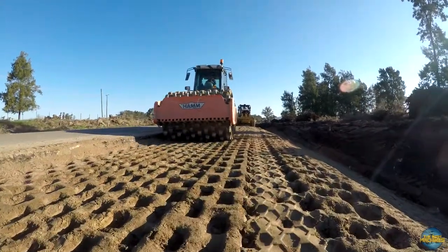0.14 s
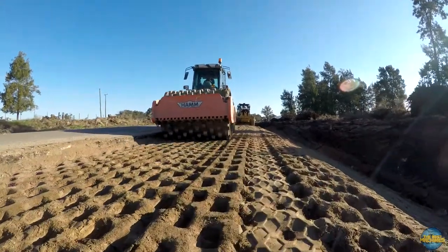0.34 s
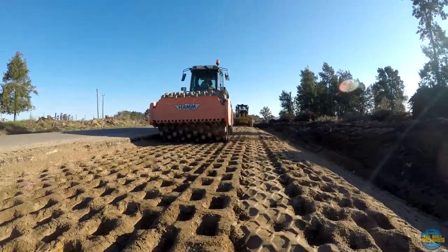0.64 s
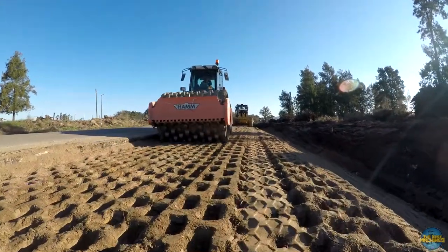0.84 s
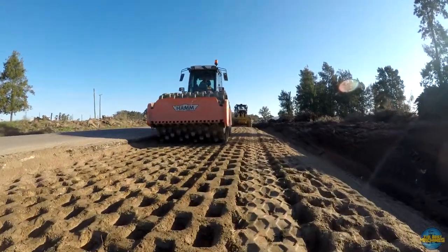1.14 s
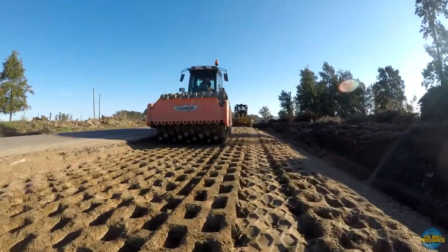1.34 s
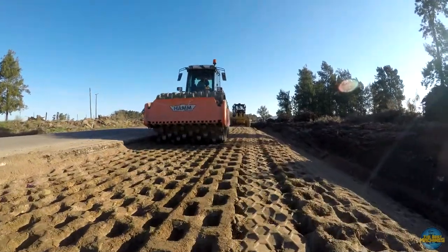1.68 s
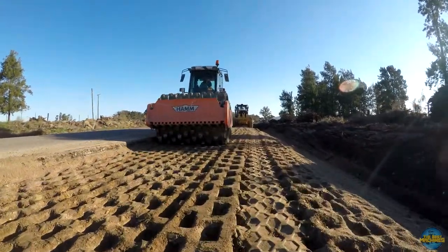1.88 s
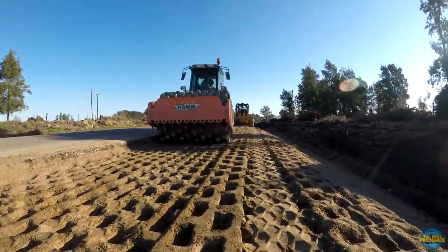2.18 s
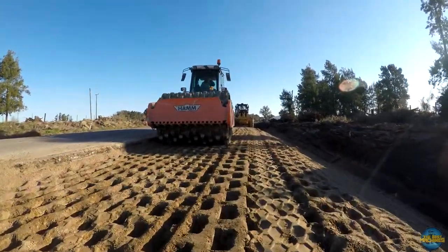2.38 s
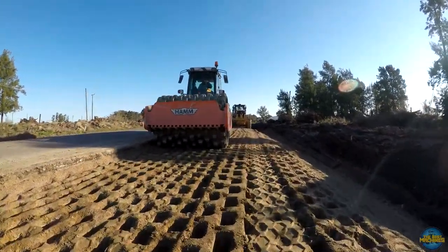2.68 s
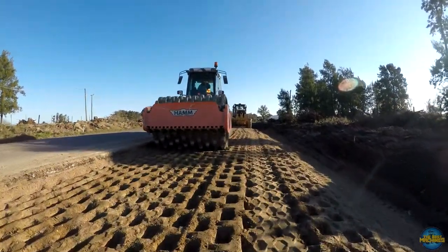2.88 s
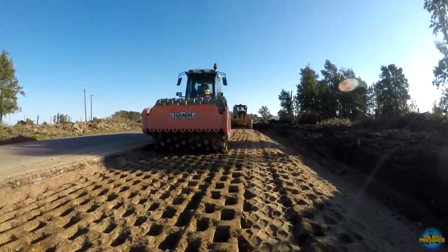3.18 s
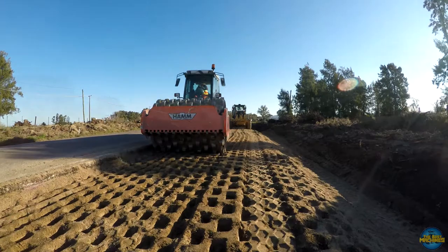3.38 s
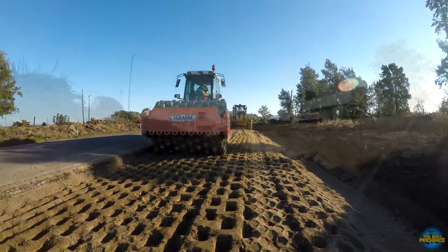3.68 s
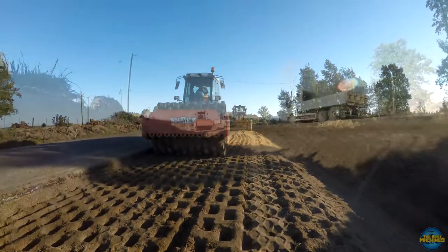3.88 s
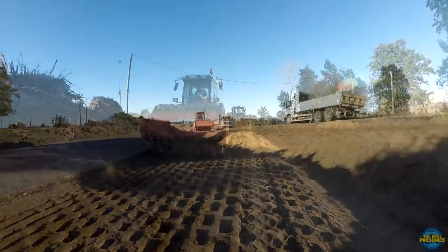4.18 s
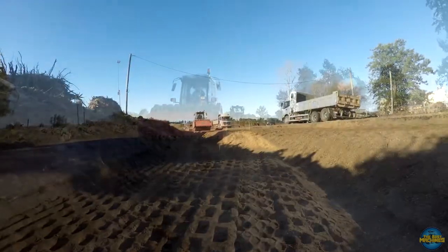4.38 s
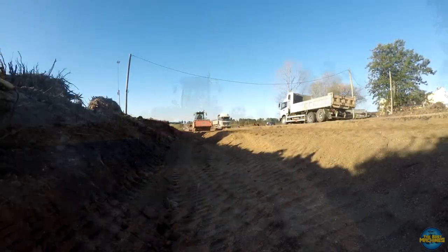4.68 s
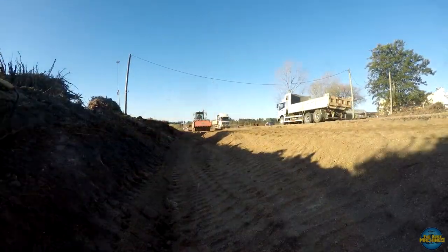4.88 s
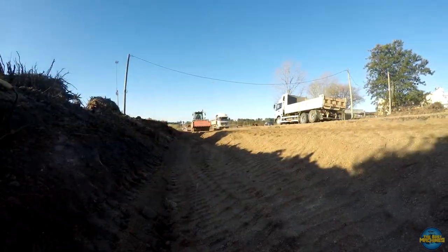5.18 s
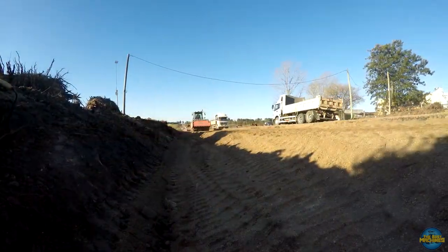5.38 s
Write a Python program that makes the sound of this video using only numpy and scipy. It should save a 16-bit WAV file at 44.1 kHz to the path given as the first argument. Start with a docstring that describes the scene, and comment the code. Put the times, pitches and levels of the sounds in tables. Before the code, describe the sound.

A diesel road roller works steadily outdoors, heard close in wide stereo. Its vibrating drum makes a very deep thudding drone at about 29 beats per second, joined by a low exhaust hum near 120 Hz and broad, gritty roar. Gear and pump tones waver above, with a hum near 370 Hz swelling around 3 s and a thin, smeared whistle near 5.3 kHz. Soft ticks and small metallic panel clanks appear throughout; a loose part taps rapidly at about 1.8-2.4 s and 3.4-4.3 s. Air hiss grows from 2.2 s, brightens to 3 s and fades by 3.4 s. From about 3.8 to 5 s the close roar crossfades to a darker, boomier, almost mono distant roar, and the whistle sinks. Around 4.4-4.6 s a dry clatter of cracks, crackle, hollow knocks and thumps strikes the microphone, with ringing clanks trailing. The low drone continues to the end, about 5.5 s.

```python
"""A roller's heavy thudding and diesel drone run on, while the roar around them dissolves from near to far.
The drum thud and the six-cylinder firing tone are sums of cosines; the roar is coloured noise in octave bands.
Gear, pump and drive tones waver, and a turbo whistles: a smeared tone. Noise and single clanks ring a panel,
a loose part taps with the drum, and hissing air and ticks are filtered noise. Near the end a clatter right at
the microphone adds cracks, crackle, knocks and thumps."""
import sys
import numpy as np
from scipy import signal
from scipy.fft import rfft, irfft, next_fast_len
from scipy.io import wavfile
from scipy.ndimage import uniform_filter1d

SR = 44100
rng = np.random.default_rng(int(sys.argv[2]) if len(sys.argv) > 2 else 0)


def output_pcm(signal):
    """Save a mono or channel-first signal as 16-bit PCM at the path in sys.argv[1].

    Samples are clipped to [-1, 1] before scaling.
    """
    pcm = np.clip(np.atleast_2d(signal).T, -1, 1) * 32767
    wavfile.write(sys.argv[1], SR, np.round(pcm).astype(np.int16))


N = 244314
T = np.arange(N) / SR  # time of each sample in seconds
SIZE = next_fast_len(N)  # length of the spectra

# Table levels are set before the waver, the near-far dissolve and the recorder.
# Speed of the drum's shaker. Each row: time in seconds, turns per second.
DRUM_SPEED = [(4.2, 29.0775), (4.45, 29.25)]
# Speed of the engine. Each row: time in seconds, four-stroke cycles per second.
ENGINE_SPEED = [(.8, 20.0775), (1, 20.04), (3.5, 20.025), (3.9, 20.04), (4.1, 20.1)]
DRUM_START, CYCLE_START = .2, -.075  # turns, cycles
# The soil pushes back unevenly. Each row: multiple of the shaker rate, sign, level against the thud
# in dB near, the same in dB far.
DRUM_OVERTONES = [(2, -1, -16, -24), (3, -1, -22.5, -15), (4, 1, -23, -29), (7, 1, -34, -34)]
# Uneven cylinders. Each row: multiple of the cycle rate, level against the firing tone in dB near, in dB far.
CYLINDER_TONES = [(3, -40, -6), (7, -18, -19), (8, -21, -30), (9, -22, -27), (18, -26, -24)]
# Drum thud, cut when the microphone is jolted. Each row: time in seconds, level in dB.
THUD_LEVEL = [(3.7, -10), (4.38, -13.5), (4.45, -16)]
# Exhaust firing tone, weakest half-way through the dissolve. Each row: time in seconds, level in dB.
FIRING_LEVEL = [(1.2, -22), (2.2, -20.5), (3, -22.5), (3.8, -21.5), (4.35, -25.5), (5.2, -20)]
DISSOLVE_START_S, DISSOLVE_END_S = 3.78, 4.96

# Gear and pump tones. Each row: multiple of the cycle rate, level in dB, left minus right in dB,
# wavering in dB, left lead in radians.
PUMP_TONES = [(28.5, -56, -4, 2.5, 1.5), (54, -56, -1, 2.5, 2.2), (72, -63, -3, 2.5, 1.6),
              (90, -63, -2, 2.5, 1.6)]
# The same columns, but the first is a multiple of the shaker rate.
SHAKER_TONES = [(21, -55.5, -10, 1.5, 1), (42, -61, -3, 2, 1.9), (56, -63, -2, 2, 1.5),
                (63, -63, -2, 2, 1.5)]
# Pump note that swells under load, then sags. Each row: start in seconds, end in seconds, starting level in dB.
PUMP_SWELLS = [(2.1, 3.05, -45), (3.25, 3.957, -46)]
PUMP_IDLE_DB, PUMP_ATTACK_S, PUMP_RELEASE_S, PUMP_SAG_DB_PER_S = -56, 0.037, 0.084, 4

# Drive hum that the drum chops into a comb of tones
HUM_HZ, HUM_PAN_DB, HUM_WANDER_TURNS = 373.0, -4, .1
# Place of each comb tone: shaker turns above or below the hum.
COMB_STEPS = [-6, -5, -4, -3, -2, 1, 2, 3, 4]
# Comb tones in the same order. Each row: level in dB at the middle of the echo band, left minus right in dB.
COMB_LEVELS = [(-45.5, -3), (-42, -1), (-43, -8.5), (-41, 0), (-43.5, 0.5), (-52, -3), (-48.5, -4),
               (-51, -9), (-49, -11.5)]
# The hum itself swells and sinks. Each row: time in seconds, level in dB.
HUM_LEVEL = [(0, -45), (1, -53), (1.6, -45.5), (2.2, -48.5), (2.9, -38.5), (3.3, -39.5), (4, -43.5)]
# The ground echo favours a band that climbs as the machine nears
ECHO_START_HZ, ECHO_OCTAVES_PER_S, ECHO_WIDTH_OCTAVES = 199.4, 0.32, 0.52

# Turbo whistle. Each row: time in seconds, pitch in Hz before the wobble, level in dB before a 4.5 dB lift.
TURBO_WHISTLE = [(0, 5310, -53), (.25, 5298, -52), (.5, 5314, -51), (1.05, 5303, -52.5), (1.8, 5321, -54),
                 (2.2, 5311, -55), (2.5, 5336, -52.5), (3.05, 5314, -51.5), (3.25, 5322, -55),
                 (3.55, 5342, -52), (4.2, 5318, -54), (4.65, 5322, -61), (5.05, 5305, -69),
                 (5.5, 5300, -72)]
TURBO_STEADY, TURBO_WOBBLE_HZ = 1.3, 14  # steady part against the noisy part; pitch wobble

# Roar of soil, exhaust, fan and casing, low and high part. Each row: frequency in Hz, level in dB per Hz.
NEAR_LOW = [(12, -64.5), (30, -55), (45, -55.5), (68, -45), (100, -51), (160, -51.5), (220, -56.5),
            (340, -65), (450, -60), (620, -71.5)]
NEAR_HIGH = [(1000, -74), (1400, -76.5), (1800, -74), (2250, -80.5), (2650, -86.5), (3400, -86),
             (4100, -89.5), (4800, -90), (6500, -87), (8000, -88), (10000, -94.5), (12000, -106),
             (15000, -116)]
FAR_LOW = [(12, -48), (30, -54), (45, -40.5), (65, -39.5), (100, -51.5), (135, -48), (165, -55),
           (220, -56.5), (300, -67), (420, -64.5), (700, -81)]
FAR_HIGH = [(1000, -85), (1400, -82.5), (1750, -83), (2100, -83.5), (2600, -90.5), (3300, -89.5),
            (4100, -88), (4800, -93.5), (6500, -94), (7700, -96.5), (8700, -96.5), (11000, -100),
            (13000, -106), (15000, -115)]
# Level moved from the lower to the upper octave of the near roar's growl
GROWL_START_DB, GROWL_DB_PER_S = -0.5, 0.36

# The two microphone ports, for the near roar, far roar, panel and hiss. Each row: frequency in Hz,
# likeness from 0 to 1 (taken as 1 for a single small source), left lead in radians, left minus right in dB.
NEAR_PORTS = [(158, 0.96, 0.16, -2.5), (260, 0.82, -0.5, -4.5), (563, 0.85, 1.5, -5), (717, 0, -2.5, -16.5),
              (800, 0.94, 5.5, -6.5), (1130, 0.52, 3, -1.5), (1750, 0.76, 1.5, -1), (2510, 0.4, 2, 1.5),
              (4170, 0.76, -0.34, -5), (4500, 0.8, -0.5, -1), (4980, 1, 7, -7.5), (7400, 0, 1.5, -7.5),
              (10100, 0, 21, -2)]
FAR_PORTS = [(250, 1, 0.00025, 0), (15000, 1, 0.014, 0)]
PANEL_PORTS = [(830, 1, 2.25, -3)]
HISS_PORTS = [(2800, .7, 0, -2), (3500, .6, 0, -3), (6000, .4, 0, -10), (9000, .1, 0, -2),
              (12000, .1, 0, 2)]

# Two resonances of the panel. Each row: frequency in Hz, width in Hz, strength in dB.
PANEL_MODES = [(821, 89, 15), (855, 33, -8.5)]
# Clanks on the panel. Each row: time in seconds, level in dB before a 5 dB lift, length in seconds,
# upper resonance against the lower in dB.
CLANKS = [(1.553, -42, .027, -12), (2.26, -34, .0073, -12), (2.351, -31.5, .012, -12),
          (2.371, -32, .01, -12), (2.611, -33, .006, -8), (2.811, -32, .005, -12), (3.035, -38, .036, -4),
          (3.158, -40, .012, -4), (3.616, -36, .01, -12), (4.055, -36, .0082, -12), (4.424, -38, .032, 0),
          (4.467, -37, .02, 0), (4.5, -37, .016, 0), (4.52, -24.5, .0076, -10), (4.569, -27, .012, 0),
          (4.585, -33, .034, -4), (4.635, -33, .036, -14), (4.683, -35.5, .016, -10),
          (4.711, -37.5, .024, -10), (4.825, -42, .02, -8)]
PANEL_NEAR_DB, PANEL_FAR_DB = -39.5, -44

# Two narrow bands of hiss from the machine come and go. Each row: time in seconds, lower dB, upper dB.
WHISPER_LEVELS = [(0.0, -64, -63), (0.43, -61, -60), (0.72, -66, -71), (0.98, -64, -72), (1.61, -68, -65),
                  (1.74, -57, -58), (2.07, -62, -67), (2.37, -62, -67), (2.7, -58, -53), (2.93, -54, -61),
                  (3.15, -60, -60), (3.38, -64, -65), (3.74, -67, -62), (4.14, -68, -68),
                  (5.25, -56.5, -57), (5.5, -61, -58)]
# The two bands. Each row: frequency in Hz, width in Hz.
WHISPER_BANDS = [(3760, 360), (4430, 230)]

# Resonances of the air hiss. Each row: frequency in Hz, width in Hz, strength in dB.
HISS_BANDS = [(2850, 480, 11), (3450, 520, 15.5), (5850, 1200, 7.5), (8000, 3500, -10)]
HISS_START_S, HISS_TOP_S, HISS_END_S, HISS_DB, HISS_TILT_DB = 2.16, 3.01, 3.36, -45, 3.5
# Short ticks with a dull body and a puff of treble. Each row: middle in seconds, body level in dB,
# puff level in dB, half of the full length in seconds.
TICKS = [(0.231, -52, -46, 0.037), (0.792, -48, -65, 0.012), (1.332, -46, -53, 0.023),
         (1.587, -60, -47.5, 0.013), (2.032, -44.5, -48, 0.023), (2.516, -42, -63, 0.011),
         (2.657, -40, -65, 0.016), (3.404, -34.5, -44.5, 0.015)]
BODY_HZ, PUFF_HZ, PUFF_PAN_DB = 1400, 6800, -11.5

# A loose part taps once a drum turn in spells. Each row: start in seconds, end in seconds, level in dB,
# place in the turn, chatter after the tap from 0 to 1.
RATTLE_SPELLS = [(1.75, 2.42, -47.5, .2, .15), (3.35, 4.3, -46.5, -.03, .03)]
# Resonances of the loose part. Each row: frequency in Hz, width in Hz, strength in dB.
RATTLE_MODES = [(1550, 300, -5), (1850, 280, -2), (2150, 300, 0), (2900, 500, -17)]
RATTLE_IDLE_DB, RATTLE_RAMP_S = -75, 0.23
REBOUND_TURNS, REBOUND_DB, CHATTER_TURNS = .17, -4, .22

# Clatter at the microphone. Each row: time in seconds, crackle in dB, length in seconds, first crack in dB,
# thump in dB, knock in dB, treble trim in dB, left minus right in dB.
JOLTS = [(4.407, -36, 0.0088, -35, -43, -28, -5, -3), (4.418, -34.5, 0.019, -14, -11, -30, -4, 2.5),
         (4.466, -40, 0.0091, -42, -43, -34, -2, 4), (4.473, -34.5, 0.011, -22, -44, -47, -3, 1),
         (4.584, -34.5, 0.0097, -23, -46, -47, -7, 4), (4.497, -37.5, 0.018, -38, -46, -37, -6, -2),
         (4.525, -33.5, 0.015, -25, -11, -28, -3, 1), (4.568, -34, 0.021, -26, -20, -22.5, 0, -2)]
# Resonances of the crackle, four body bands then two treble. Each row: frequency in Hz, width in Hz, dB.
CRACKLE_BANDS = [(502, 240, 1), (1140, 740, -3), (1790, 380, 6.5), (2180, 280, -8), (4550, 6600, -9.5),
                 (7200, 2300, -19)]
CLATTER_TAIL_DB, CLATTER_TAIL_S = -13, 0.023
KNOCK_HZ, KNOCK_S = 412, 0.011
THUMP_HZ, THUMP_S, THUMP_LATE_S = 100, .004, .003

TOP_HZ = 15050  # upper limit of the recorder


def undb(db):
    """Turns decibels into gain."""
    return 10 ** (np.asarray(db) / 20)


def curves(table):
    """Draws each column of a time table, one value a sample; ends are held."""
    s, *columns = np.transpose(table)
    return [np.interp(T, s, c) for c in columns]


def unit(x):
    """Scales a sound to an rms of 1."""
    return x / np.sqrt(np.mean(x ** 2))


def walk(rate):
    """Drifts between random levels, rate of them a second, smoothed twice; the spread is near 1."""
    held = np.repeat(rng.standard_normal(int(N / SR * rate) + 3), 8)
    soft = uniform_filter1d(uniform_filter1d(held, size=8), size=8)
    return 1.31 * np.interp(T * rate * 8, np.arange(len(soft)), soft)


def spell(start, end, attack, release):
    """Rises from 0 at the start to 1, holds until the end, then falls."""
    return np.clip(np.minimum((T - start) / attack, 1 - (T - end) / release), 0, 1)


def ring(x, modes):
    """Sends a sound through side-by-side resonances (Hz, width Hz, dB)."""
    return sum(undb(db) * signal.lfilter(*signal.iirpeak(hz, hz / width, SR), x) for hz, width, db in modes)


def pan(x, db):
    """Makes left and right at a level difference."""
    return x * undb(np.array([[db], [-db]]) / 2)


def ports(left, other, table):
    """Spectra at both ports: the right one hears a part of the left, shifted, and a part of its own."""
    hz, *columns = np.transpose(table)
    logf = np.log(np.maximum(np.fft.rfftfreq(SIZE, 1 / SR), 1))
    like, lead, db = (np.interp(logf, np.log(hz), c) for c in columns)
    if other is None:  # one small source: both ports hear only it
        like, other = 1, 0
    like = np.clip(like, 0, 1)
    right = like * np.exp(-1j * lead) * left + np.sqrt(1 - like ** 2) * other
    return np.array([left * undb(db / 2), right * undb(-db / 2)])


def roar(colour, table, throb, flicker_db, growl_db):
    """Coloured noise; octave bands flicker alone and those above the bass throb with the machine."""
    logf = np.log2(np.maximum(np.fft.rfftfreq(SIZE, 1 / SR), 1))
    hz, level_db = np.transpose(colour)
    gain = undb(np.interp(logf, np.log2(hz), level_db)) * np.sqrt(SR / 2)
    both = gain * ports(*rfft(rng.standard_normal((2, SIZE))), table)
    out = 0
    for octave in range(3, 15):  # band centres at 2 ** octave Hz
        window = np.cos(np.pi / 2 * np.clip(logf - octave, -1, 1)) ** 2
        band = irfft(both * window, SIZE)[:, :N]
        tilt_db = {8: -growl_db, 9: growl_db}.get(octave, 0)
        depth_db = flicker_db * (1 if octave > 7 else .4)
        level = undb(depth_db * walk(12) + tilt_db)
        out = out + band * level * (throb if octave > 8 else 1)
    return out


def drone(drum, cycle, share):
    """Drum thud with its overtones and the exhaust firing tone with the cylinder orders."""
    thud = np.cos(2 * np.pi * drum)
    for order, sign, near_db, far_db in DRUM_OVERTONES:
        db = far_db + (near_db - far_db) * np.sqrt(share)
        thud = thud + sign * undb(db + 1.2 * walk(3.5)) * np.cos(2 * np.pi * order * drum)
    fire = np.cos(2 * np.pi * 6 * cycle)  # six firings a cycle
    for order, near_db, far_db in CYLINDER_TONES:
        db = far_db + (near_db - far_db) * share + 2.0 * walk(3.3)
        turns = order * cycle + rng.random() + 0.04 * walk(6)
        fire = fire + undb(db) * np.cos(2 * np.pi * turns)
    thud_gain, fire_gain = undb(curves(THUD_LEVEL)[0]), undb(curves(FIRING_LEVEL)[0])
    return np.sqrt(2) * (thud_gain * thud + fire_gain * fire)


def tones(drum, cycle):
    """Gear, pump and drive parts hum at multiples of the engine and drum speeds, wavering in pitch and level."""
    rows = [(k * cycle, *rest) for k, *rest in PUMP_TONES]
    rows += [(k * drum, *rest) for k, *rest in SHAKER_TONES]
    for step, (db, pan_db) in zip(COMB_STEPS, COMB_LEVELS):
        turns = HUM_HZ * T + step * drum
        wander = HUM_WANDER_TURNS * walk(12)
        hz = np.gradient(turns) * SR
        off = np.log2(hz / ECHO_START_HZ) - ECHO_OCTAVES_PER_S * T  # octaves from the echo band
        echo_db = -6 * (off / ECHO_WIDTH_OCTAVES) ** 2
        rows.append((turns + wander, db + echo_db, pan_db, 3.5, 0))
    rows.append((HUM_HZ * T, curves(HUM_LEVEL)[0], HUM_PAN_DB, 1.5, 0))
    pump = undb(PUMP_IDLE_DB)
    for start, end, db in PUMP_SWELLS:
        swell = spell(start, end, PUMP_ATTACK_S, PUMP_RELEASE_S)
        pump = pump + undb(db - PUMP_SAG_DB_PER_S * (T - start)) * swell
    rows.append((36 * cycle, 20 * np.log10(pump), -11, 1.5, 1.8))
    out = 0
    for turns, db, pan_db, waver_db, lead in rows:
        angle = 2 * np.pi * (turns + 0.077 * walk(5.14)) + np.array([[lead], [0]])
        tone = undb(db + waver_db * walk(7.02)) * np.cos(angle)
        out = out + pan(tone, pan_db)
    return np.sqrt(2) * out


def turbo():
    """A wobbling whistle with a noisy skirt, unrelated at the two ports."""
    hz, db = curves(TURBO_WHISTLE)
    slow = signal.lfilter(*signal.butter(1, 20, fs=SR), rng.standard_normal((2, 2, N)))
    wobble = TURBO_WOBBLE_HZ * np.array([walk(40), walk(40)])
    spin = np.exp(2j * np.pi * np.cumsum(hz + wobble, axis=1) / SR)
    smear = (TURBO_STEADY + unit(slow[0]) + 1j * unit(slow[1])) * spin
    return pan(unit(smear.real) * undb(db + 4.5), -10.0)


def panel(share):
    """Shaking rings a panel and single clanks make it sing; near, the ports hear it out of step."""
    shake_db = PANEL_FAR_DB + (PANEL_NEAR_DB - PANEL_FAR_DB) * np.sqrt(share)
    shaking = rng.standard_normal(N) * undb(1.7 * walk(40))
    out = unit(ring(ring(shaking, PANEL_MODES), PANEL_MODES)) * undb(shake_db)
    t = T[:SR // 10]
    lower, upper = (np.sin(2 * np.pi * hz * t) for hz, _, _ in PANEL_MODES)
    for s, db, length, upper_db in CLANKS:
        song = unit(lower + undb(upper_db) * upper)
        shape = np.minimum(t / 0.001, 1) / (1 + (t / length) ** 4)
        first = int(s * SR)
        out[first:first + len(t)] += undb(db + 5.0) * shape * song
    near = irfft(ports(rfft(out, SIZE), None, PANEL_PORTS), SIZE)[:, :N]
    return share * near + (1 - share) * out / 2


def whisper(share):
    """Noise in two narrow bands; partly unlike at the ports near the machine, alike further off."""
    out = 0
    for (hz, width), db in zip(WHISPER_BANDS, curves(WHISPER_LEVELS)):
        band, noise = [(hz, width, 0)], rng.standard_normal((3, N))
        mixed = noise[0] + 0.49 * share * noise[1:]  # shared noise plus some of each port's own
        out = out + unit(ring(ring(mixed, band), band)) * undb(db + 1.5 * walk(15))
    return out


def air():
    """Air noise through resonances: a long hiss that brightens as it swells, and short ticks."""
    swell = spell(HISS_START_S, HISS_TOP_S, HISS_TOP_S - HISS_START_S, HISS_END_S - HISS_TOP_S)
    tilt_db = HISS_TILT_DB * swell ** 4
    noise = rng.standard_normal((2, N)) * undb(.8 * walk(30))
    lower = sum(ring(ring(noise, [(hz, width, 0)]), [(hz, width, db)]) for hz, width, db in HISS_BANDS[:2])
    upper = ring(noise, HISS_BANDS[2:])
    hiss = lower * undb(-tilt_db) + upper * undb(tilt_db)
    hiss = signal.lfilter(*signal.butter(2, 12500, fs=SR), hiss)
    out = irfft(ports(*rfft(hiss * swell * undb(HISS_DB), SIZE), HISS_PORTS), SIZE)[:, :N]
    for s, body_db, puff_db, length in TICKS:
        at = slice(int((s - length) * SR), int((s + length) * SR))
        shape = np.hanning(len(T[at]))
        for hz, db in (BODY_HZ, body_db), (PUFF_HZ, puff_db):
            band = [(hz, .8 * hz, 0)]
            burst = ring(ring(rng.standard_normal((2, SR // 10)), band), band)[:, :len(shape)]
            out[:, at] += pan(unit(burst) * shape * undb(db), PUFF_PAN_DB)
    return out


def rattle(drum):
    """One tap a drum turn, a rebound and a fading chatter; each turn has its own strength."""
    gain = undb(RATTLE_IDLE_DB)
    for start, end, db, *_ in RATTLE_SPELLS:
        gain = gain + undb(db) * spell(start, end, RATTLE_RAMP_S, RATTLE_RAMP_S)
    # place and chatter glide between the two spells
    between = [RATTLE_SPELLS[0][1], RATTLE_SPELLS[1][0]]
    place, chatter = (np.interp(T, between, c) for c in np.transpose(RATTLE_SPELLS)[3:])
    turn = drum - place + 1
    strength = undb(1.5 * rng.standard_normal((N // 1000, 2)))[turn.astype(int)].T
    tap = strength[0] * np.diff(turn // 1, prepend=1)
    rebound = undb(REBOUND_DB) * strength[1] * np.diff((turn - REBOUND_TURNS) // 1, prepend=1)
    fade = np.exp(-(turn % 1) / CHATTER_TURNS)
    blow = tap + rebound + chatter * strength[0] * fade * rng.standard_normal(N)
    taps = sum(ring(ring(blow, [(hz, width, 0)]), [(hz, width, db)]) for hz, width, db in RATTLE_MODES)
    return irfft(ports(rfft(unit(taps) * gain, SIZE), None, NEAR_PORTS), SIZE)[:, :N]


def clatter():
    """Each jolt: a crack, crackle that drops to a short tail, a hollow knock and a dull thump."""
    out, t = np.zeros((2, N)), T[:SR // 10]
    for s, db, length, crack_db, thump_db, knock_db, treble_db, pan_db in JOLTS:
        grit = rng.standard_normal((3, len(t))) * undb(2.5 * rng.exponential(size=len(t)))
        dull = signal.lfilter(*signal.butter(4, 10500, fs=SR), grit[0] + 1.46 * grit[1:])
        body = ring(dull, CRACKLE_BANDS[:4])
        treble = ring(dull, CRACKLE_BANDS[4:]) * undb(treble_db)
        hold = 1 / (1 + (t / length) ** 7.3)
        tail = undb(CLATTER_TAIL_DB) * np.exp(-t / CLATTER_TAIL_S)
        crackle = ((body + treble) * hold + body * tail) / np.std(body + treble)
        crackle = crackle * np.minimum(t / 0.0013, 1)
        crack = np.exp(-t / 0.00091) * np.sin(2 * np.pi * 2200 * t)
        knock = np.exp(-t / KNOCK_S) * np.sin(2 * np.pi * KNOCK_HZ * t)
        thump_shape = t / THUMP_S * np.exp(1 - t / THUMP_S)
        thump = thump_shape * np.sin(2 * np.pi * THUMP_HZ * (t - THUMP_LATE_S))
        sides = pan(undb(db) * crackle + undb(crack_db) * crack, pan_db)
        middle = undb(thump_db) * thump + undb(knock_db) * knock
        first = int(s * SR)
        out[:, first:first + len(t)] += sides + middle
    return out


def scene():
    """Near and far spot dissolve at equal power; the drone carries through both."""
    drum = DRUM_START + np.cumsum(curves(DRUM_SPEED)[0]) / SR
    cycle = CYCLE_START + np.cumsum(curves(ENGINE_SPEED)[0]) / SR
    share = np.interp(T, [DISSOLVE_START_S, DISSOLVE_END_S], [1, 0])  # 1 near, 0 far
    throb = 1 + 0.083 * np.cos(2 * np.pi * drum) + 0.064 * np.cos(2 * np.pi * 6 * cycle)
    growl_db = GROWL_START_DB + GROWL_DB_PER_S * T
    near = roar(NEAR_LOW + NEAR_HIGH, NEAR_PORTS, throb, 1.25, growl_db) + tones(drum, cycle)
    far = roar(FAR_LOW + FAR_HIGH, FAR_PORTS, throb, 1.84, 1.0)
    bass = drone(drum, cycle, share) * undb(np.array([[-.75], [.75]]) * share)  # near, it leans right
    parts = turbo() + panel(share) + whisper(share) + air() + np.sqrt(share) * rattle(drum) + clatter()
    return np.sqrt(share) * near + np.sqrt(1 - share) * far + bass + parts


def record(dry):
    """The recorder rounds the loudest peaks and cuts the top."""
    rounded = np.tanh(0.8 * dry) / 0.88
    return signal.sosfilt(signal.ellip(8, .2, 70, TOP_HZ, fs=SR, output="sos"), rounded)


dry = scene()
out = record(dry)
output_pcm(out)
```